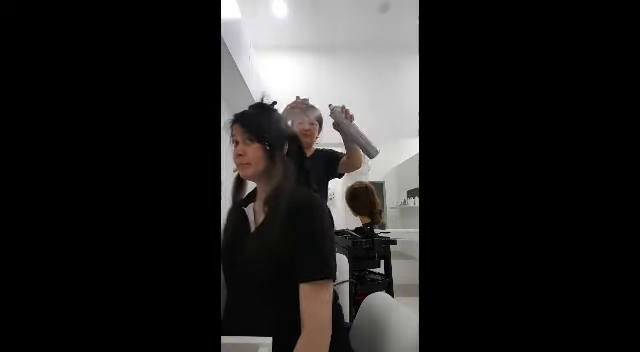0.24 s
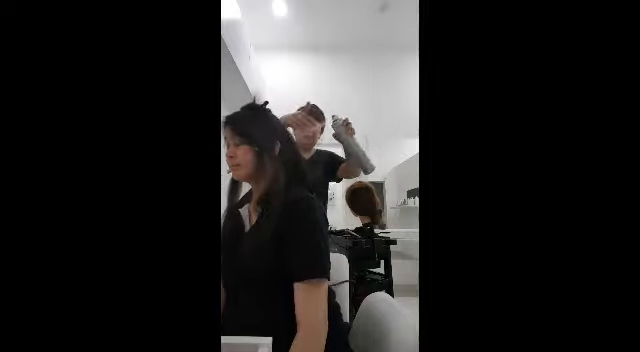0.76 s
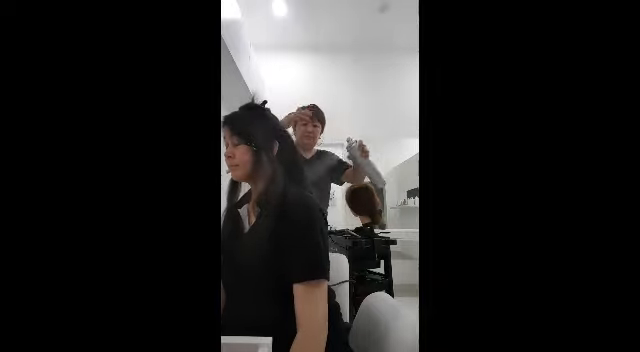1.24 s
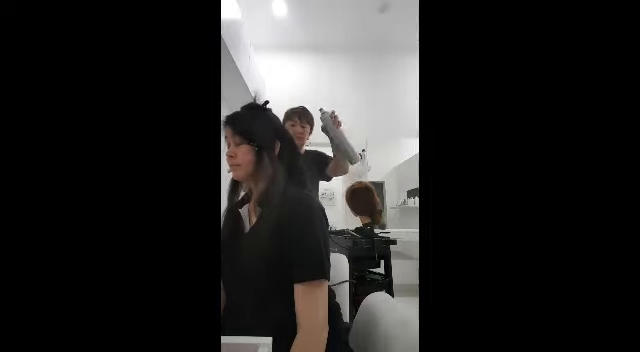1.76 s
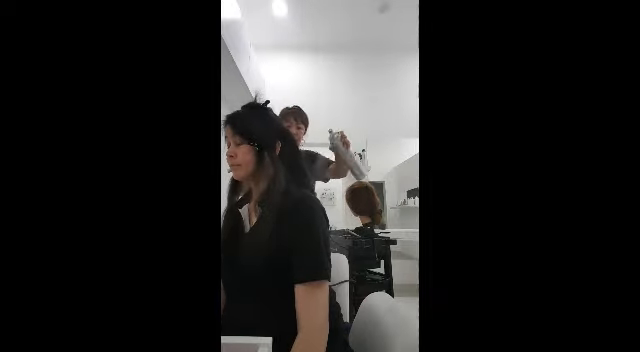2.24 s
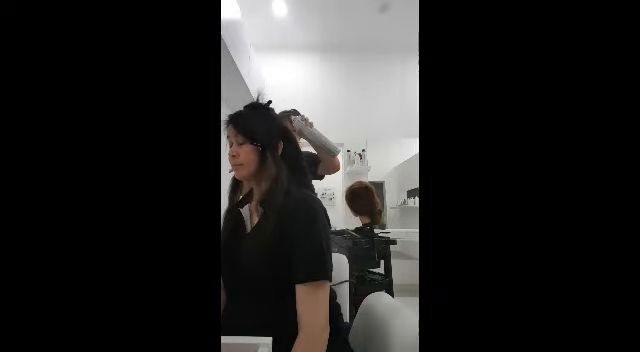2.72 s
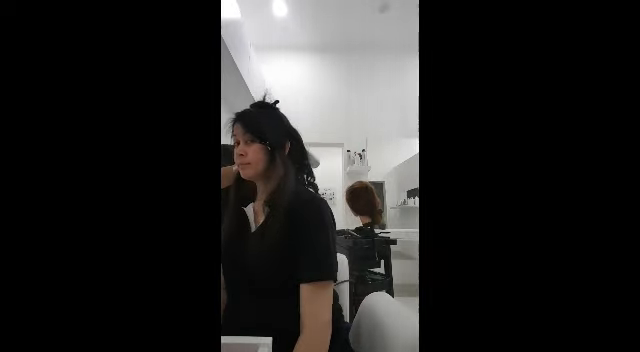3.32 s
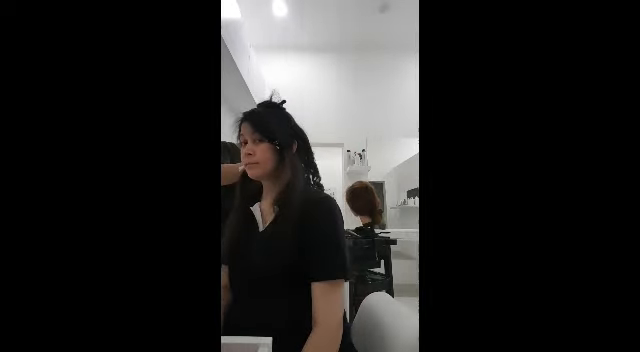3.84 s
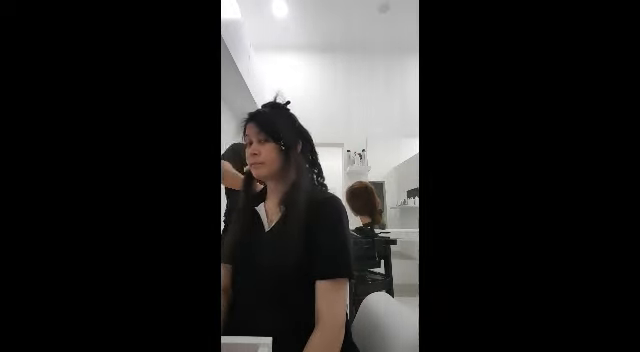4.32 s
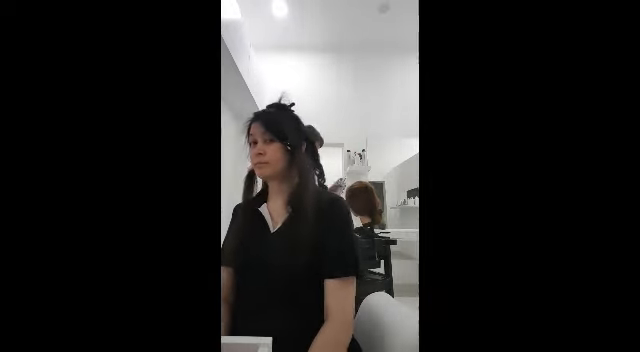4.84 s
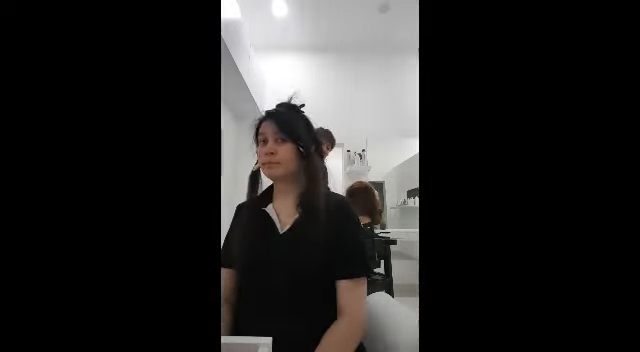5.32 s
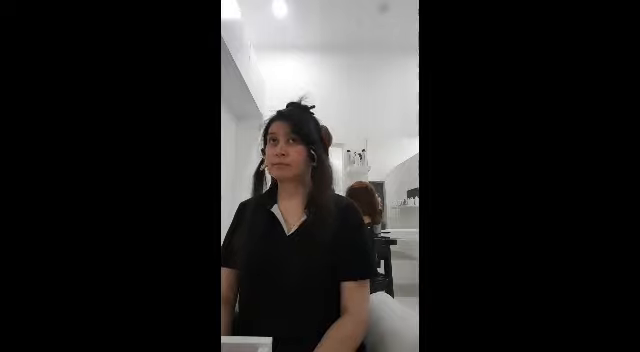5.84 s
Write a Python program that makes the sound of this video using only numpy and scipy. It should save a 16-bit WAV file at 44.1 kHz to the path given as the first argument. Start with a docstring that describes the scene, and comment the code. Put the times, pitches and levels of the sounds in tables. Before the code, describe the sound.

An aerosol can sprays three hissing bursts onto hair over a low ventilation hum, then furniture knocks and clatters.

```python
"""A hard-walled salon: an aerosol can sprays three long bursts a few steps away.
The jet sizzles at the nozzle, hisses as it spreads, splashes on hair and drags air along.
Underneath, ventilation drones in the low modes of the room. Small things clink and tick,
and near the end furniture is knocked farther off, its panels ringing and swelling in the echo."""
import sys
import numpy as np
from scipy import signal
from scipy.fft import rfft, irfft, next_fast_len
from scipy.io import wavfile
from scipy.ndimage import uniform_filter1d, map_coordinates

SR = 44100
rng = np.random.default_rng(int(sys.argv[2]) if len(sys.argv) > 2 else 0)


def generate_wav(sig):
    """Save sig (samples, or channels by samples) to the path in sys.argv[1] as 16-bit PCM at SR."""
    pcm = np.round(np.clip(np.atleast_2d(sig).T, -1, 1) * 32767).astype(np.int16)
    wavfile.write(sys.argv[1], SR, pcm)


N = 267775

# reverb time of the salon: f/Hz, T60/s
ROOM_DECAY = [(150, 0.28), (500, 0.57), (1800, 0.87), (2900, 0.91), (6000, 0.6), (14000, 0.25)]
# stereo image, near mono in the bass and wide on top: f/Hz, left-right correlation
CORRELATION = [(60, .93), (150, .994), (300, .985), (450, .78), (700, .3), (1000, -.1), (1600, 0),
               (15000, 0)]
# stereo balance: f/Hz, left over right/dB
BALANCE = [(60, -0.5), (150, 2), (380, -2), (950, -5), (2380, -3), (5980, -5), (15000, 2)]

# noise colours: f/Hz, relative level/dB
AIR_EQ = [(12, -51), (20, -14), (63, -13), (87, -8), (185, -8), (218, -21), (275, -9), (384, -18),
          (484, -15), (573, -25.5), (680, -26), (1000, -24), (3000, -36), (4500, -46), (6600, -120)]  # ventilation rumble
FAR_HISS_EQ = [(1470, -47), (2500, -7.5), (4700, -7), (8620, -12), (9310, -19.5), (13600, -9),
               (15700, -18.5)]  # faint distant hiss
SIZZLE_EQ = [(7000, -29), (10000, -8), (11500, -2), (13000, 1), (14500, 4), (15800, -1)]  # jet at the nozzle
PLUME_EQ = [(2350, -30.5), (4000, -9), (5920, -1.5), (7510, -1.5), (10500, -3.5), (13600, -3.5),
            (22000, -120)]  # spreading plume
SPLASH_EQ = [(1000, -7.5), (1500, -2.5), (2100, 3), (2750, 5), (3250, -1.5), (4200, -1), (5500, -25)]  # mist on hair
DRAUGHT_EQ = [(350, -20), (600, -7), (780, -6), (950, -2), (1200, -9.5), (1500, -6), (2200, -87)]  # air dragged along

# resonances: f/Hz, width/Hz, level/dB
ROOM_MODES = [(48, 48, -63), (98.6, 16.4, -60), (179.6, 33.7, -55), (267, 59, -64.5), (354.7, 32, -67.5)]  # driven by the ventilation
FLOOR_MODES = [(156.5, 39, -7)]  # boom
BODY_MODES = [(231.6, 17.6, 3.5)]  # hollow note
LARGE_PANEL_MODES = [(269, 16, 0.5), (363, 25, -5.5)]  # thud
SMALL_PANEL_MODES = [(444, 22, -5), (501, 36, -5.5), (560, 66, -10.5), (647, 29, -15.5), (689, 27, -11.5)]  # woody knock
FRAME_MODES = [(938, 110, 1.5), (1130, 30, 3)]  # rap
EDGE_MODES = [(1214, 62, -4.5), (1341, 65, 2), (1381, 37, 2), (1445, 33, 4.5), (1486, 13, 2),
              (1837, 150, -0.5)]  # crack
FITTING_MODES = [(1800, 700, 9.5), (3100, 850, -9.5), (4200, 660, -10), (5950, 1400, -36),
                 (7900, 1800, -23)]  # clack
TICK_MODES = [(3060, 1500, -3), (13000, 670, 3)]  # tiny hard contact

# furniture hits: t/s, then level/dB of floor, body, large panel, small panel, frame, edge, fittings
KNOCK_CUES = [(-.06, 3, 8, 14, 13.5, -11, -19.5, -28.5), (5.5558, 3, 12.5, -3, 9, -0.5, -4, -20.5),
              (5.624, 28.5, 26, 13, 26, 2.5, 15, -12), (5.641, 16, 12, 28, 13, -8, -14, -30),
              (5.659, 5, 9, 15, 15, -17.5, -6, -26), (5.669, 10, 17, 29, 9, -17, -19, -26),
              (5.688, -3, 8, 25, 12.5, -14, -8, -36), (5.705, 11, 11, 24.5, 13, -17, -15, -32),
              (5.721, 1, 11, 5, 9, -7, -2, -37), (5.855, 16.5, 0, 13, 8, -14, -4, -38),
              (5.91, 1.5, 3, 11.5, 3, -5, -9, -14), (5.963, 18, 22.5, 0, 17, -12, 8, -6),
              (5.976, 27, 26.5, -3, 3, 0.5, -6, -12.5), (6.012, 18, 7, 16, 1, -7, -4, -18),
              (6.045, 2, 23, 8, 10, -18, -19, -36)]
# light clinks, and the sharp cracks of the furniture knocks: t/s, level/dB, f/Hz, width/Hz, echo send/dB
RING_CUES = [(.25, -7, 2530, 400, -2), (1.52, -7.5, 2760, 380, -8), (2.123, -0.5, 2650, 700, 0),
             (2.139, -3, 2620, 600, -17), (5.559, -19, 2670, 402, 14), (5.6237, 15.5, 1490, 540, -5),
             (5.6236, -0.5, 2430, 900, 3), (5.909, -4, 2890, 190, 6), (5.911, -13, 2000, 350, 2),
             (5.922, -6, 2930, 220, 1), (5.958, -9, 2900, 300, -3), (5.963, 9, 1700, 350, -2),
             (5.985, -7, 2940, 299, -1)]
# dry ticks close by: t/s, level/dB
TICK_CUES = [(5.3868, -31.5), (5.461, -30.5)]
# button presses: press t/s, let-go t/s, opening/s, mist onset t/s, mist fade-in/s, closing/(dB/s),
# dribble length/s, dribble level/dB, splash level/dB, draught level/dB
BURST_CUES = [(0.131, 1.323, 0.069, 0.19, 0.0066, 259, 0.36, -33, -9, -16),
              (1.855, 2.548, 0.09, 1.888, 0.036, 126, 0.2, -31, -8, -32),
              (2.791, 4.301, 0.035, 2.67, 0.19, 134, 0.284, -31, -6.5, -13)]
# ride of the spray, one curve a burst: t/s, level/dB, turn from the right/dB (scaled by BEAMING)
FLOW_CURVES = [
    [(0.2, -50, -14), (0.372, -48, -10.5), (0.428, -47, -14.5), (0.538, -50, -15), (0.828, -48.5, -12.5),
     (1.118, -50.5, -15), (1.152, -47.5, -13.5), (1.33, -47.5, -13.5)],
    [(1.94, -40, -14), (1.954, -46, -15), (2.072, -46, -15), (2.104, -47.5, -17), (2.122, -44, -13),
     (2.316, -46, -16.5), (2.438, -43.5, -12), (2.53, -48, -14.5)],
    [(2.83, -60, 39), (2.86, -57, -14), (2.9, -51, 0), (2.922, -50.5, -10), (3.108, -50.5, -11.5),
     (3.388, -52.5, -7.5), (3.444, -52.5, -10.5), (3.528, -54, -11.5), (4.242, -50.5, -12),
     (4.27, -53, -12.5)],
]
# brief dips in the spray's mid band: t/s, level/dB, half-width/s
MID_DIPS = [(2.225, -20, 0.014), (3.522, -29, .012), (3.87, -14, 0.0093)]

SIZZLE_DB, PLUME_DB, BEAMING = -6, 1.5, 1.26
OPENING_POWER = 1.88  # the jet grows as this power of the button's travel
SURGE_DB, SURGE_S = 9, 0.04  # the first mist lands hardest
DRY_UP_S = 0.058  # fade-out of the dribble
HIT_LAG_S, WRAP_HZ = 14 / SR, 700  # hits reach the right late; the lag shrinks below WRAP_HZ


def amp(db):
    """Decibels to gain."""
    return 10 ** (np.asarray(db) / 20)


def unit(x):
    """x scaled to rms 1."""
    return x / np.sqrt(np.mean(x ** 2) + 1e-20)


def along(points, hz):
    """Read (f/Hz, value) points on a log frequency axis."""
    f, v = np.transpose(points)
    return np.interp(np.log(hz + 1), np.log(f + 1), v)


def wobble(rate):
    """A smooth random curve, rate knots a second."""
    knots = rng.standard_normal(int(N * rate / SR) + 4)
    return map_coordinates(knots, [np.arange(N) * rate / SR])


def filtered(x, response):
    """x through a complex frequency response."""
    size = next_fast_len(x.shape[-1] + SR // 2)
    return irfft(rfft(x, size) * response(np.fft.rfftfreq(size, 1 / SR)), size)[..., :x.shape[-1]]


def eq(points):
    """Response of an EQ curve."""
    return lambda f: amp(along(points, f))


def modes(table, level_db=0):
    """Response of a bank of resonances, alternating in polarity."""
    return lambda f: amp(level_db) * sum(
        (-1) ** k * amp(db) * 1j * f * width / (hz * hz - f * f + 1j * f * width)
        for k, (hz, width, db) in enumerate(table))


def ring(hz, width, level_db=0):
    """One resonance applied twice, for steep skirts."""
    return lambda f: amp(level_db) * modes([(hz, width, 0)])(f) ** 2


def soft(f, corner_hz):
    """Two-pole low-pass: the dulling of a soft contact or of distance."""
    return 1 / (1 + 1j * f / corner_hz) ** 2


def stereo(pair, response=lambda f: 1, min_correlation=-1, lag_samples=0):
    """Two unrelated signals as mid and side: alike in the bass, apart in the treble."""
    def spread(f):
        angle = np.arccos(np.clip(along(CORRELATION, f), min_correlation, 1)) / 2
        return response(f) * np.array([np.cos(angle), np.sin(angle)])
    mid, side = filtered(pair, spread)
    return np.array([mid + side, np.roll(mid - side, lag_samples)])


def rush(response, patchy_db, **image):
    """Coloured stereo noise of rms 1, mottled in time and frequency by patches of random gain."""
    spectra = signal.stft(rng.standard_normal((2, N)), nperseg=512)[2]
    patches = uniform_filter1d(rng.standard_normal(spectra.shape[1:]), size=4, axis=0)
    patches = uniform_filter1d(patches, size=14, axis=1)
    pair = signal.istft(spectra * amp(patchy_db * unit(patches)), nperseg=512)[1][:, :N]
    return unit(stereo(pair, response, **image))


def echo(swell_cycles):
    """A fresh room tail: each frequency swells over some cycles, then dies at its own speed."""
    hz, t, spectra = signal.stft(rng.standard_normal((2, SR)), SR, nperseg=256)
    rise = 1 - np.exp(-t * (hz[:, None] + 50) / swell_cycles)
    decay = amp(-60 * t / along(ROOM_DECAY, hz)[:, None])
    tail = stereo(signal.istft(spectra * rise * decay, SR, nperseg=256)[1][:, :SR])
    return tail / np.linalg.norm(tail[0])


def struck(hits, direct_db, echo_db, swell_cycles, path=lambda f: 1):
    """Each (t/s, response) hit rings its object, arrives left first, then returns from the walls."""
    out = np.zeros((2, N + 2 * SR))
    lag_s = lambda f: np.array([[0], [HIT_LAG_S]]) * f ** 2 / (f ** 2 + WRAP_HZ ** 2)
    impulse = amp(direct_db) * (np.arange(SR) == 0)
    direct = filtered(impulse, lambda f: path(f) * np.exp(-2j * np.pi * f * lag_s(f)))
    for at, response in hits:
        start = round((at + 1) * SR)  # one second of pre-roll
        out[:, start:start + SR] += filtered(direct + amp(echo_db) * echo(swell_cycles), response)
    return out[:, SR:SR + N]


def ventilation():
    """The bed: broad air noise, a drone where the room resonates, a far hiss and a wavering whine."""
    air = amp(-56) * rush(eq(AIR_EQ), patchy_db=1.73)
    hiss = amp(-74) * rush(eq(FAR_HISS_EQ), patchy_db=0.6)
    drone = sum(amp(db + 1.1 * wobble(6)) * rush(ring(hz, width), patchy_db=0.6)
                for hz, width, db in ROOM_MODES)
    whine = amp(-92 + 4 * wobble(1.6)) * rush(ring(hz=11250, width=45), patchy_db=3.0)
    return air + drone + hiss + whine


def furniture_knocks():
    """Each knock rings floor, wood and fittings in its own mix; a soft contact dulls the wood."""
    parts = FLOOR_MODES, BODY_MODES, LARGE_PANEL_MODES, SMALL_PANEL_MODES, FRAME_MODES, EDGE_MODES

    def knock(wood_dbs, fittings_db):
        def response(f):
            wood = sum(modes(part, db)(f) for part, db in zip(parts, wood_dbs))
            low_cut = (1j * f / (130 + 1j * f)) ** 2
            fittings = modes(FITTING_MODES, fittings_db)(f)
            return wood * low_cut * soft(f, corner_hz=2560) + fittings * soft(f, corner_hz=5300)
        return response

    def distance(f, shelf_hz=700):
        bass_cut = (amp(-2.5) + 1j * f / shelf_hz) / (1 + 1j * f / shelf_hz)
        return bass_cut * soft(f, corner_hz=3500)

    hits = [(at, knock(wood_dbs, fittings_db)) for at, *wood_dbs, fittings_db in KNOCK_CUES]
    return struck(hits, direct_db=-1.5, echo_db=5.0, swell_cycles=1.45, path=distance)


def clinks_and_cracks():
    """Short hard rings: light clinks and the sharp cracks of the knocks; farther ones are wetter."""
    return sum(struck([(at, ring(hz, width, db))], direct_db=0, echo_db=send_db, swell_cycles=5.0)
               for at, db, hz, width, send_db in RING_CUES)


def ticks():
    """Tiny contacts close by, bright and nearly dry."""
    hits = [(at, modes(TICK_MODES, db)) for at, db in TICK_CUES]
    return struck(hits, direct_db=0.5, echo_db=-7, swell_cycles=12)


def valve(t, burst):
    """Jet, splash and draught envelopes of one press: the valve opens, shuts, then dribbles dry."""
    press, let_go, opening, onset, fade_in, closing, dribble_s, dribble_db, splash_db, draught_db = burst
    after = np.maximum(t - let_go, 0)
    jet = np.clip((t - press) / opening, 0, 1) ** OPENING_POWER * amp(-closing * after)
    dribble = (t > let_go) * amp(dribble_db) * np.clip((dribble_s - after) / DRY_UP_S, 0, 1)
    surge = amp(SURGE_DB * np.exp(-np.abs(t - onset) / SURGE_S))
    mist = jet * surge * np.clip((t - onset) / fade_in, 0, 1)
    return np.array([np.maximum(jet, dribble), amp(splash_db) * mist, amp(draught_db) * mist])


def aerosol_spray():
    """Nozzle sizzle, plume hiss, splash on hair and dragged air, all sputtering with one flow."""
    t = np.arange(N) / SR
    times, *curves = np.transpose(np.concatenate(FLOW_CURVES))
    flow_db, turn_db = [np.interp(t, times, curve) for curve in curves]
    jet, on_hair, dragged = sum(valve(t, burst) for burst in BURST_CUES)
    # the sizzle beams: its right side rises and falls as the can turns
    aim = amp(SIZZLE_DB - BEAMING * turn_db * np.array([[0], [1]]))
    image = dict(min_correlation=0.27, lag_samples=4)  # the direct share, a touch late on the right
    sizzle = jet * aim * amp(0.6 * wobble(55)) * rush(eq(SIZZLE_EQ), patchy_db=1.6)
    plume = jet * amp(PLUME_DB) * rush(eq(PLUME_EQ), patchy_db=2.2, **image)
    splash = on_hair * amp(0.92 * wobble(9)) * rush(eq(SPLASH_EQ), patchy_db=2.6, **image)
    draught = dragged * amp(0.8 * wobble(10)) * rush(eq(DRAUGHT_EQ), patchy_db=1.6)
    dips = amp(sum(db * np.exp(-((t - at) / width) ** 2) for at, db, width in MID_DIPS))
    sputter_db = 0.5 * wobble(8) + 1.05 * wobble(35) + 0.5 * wobble(90)
    direct = amp(flow_db + sputter_db) * (sizzle + plume + dips * (splash + draught))
    reverb = signal.fftconvolve(direct, echo(swell_cycles=2.0), axes=1)[:, :N]
    return direct + amp(-7.5) * reverb


def scene():
    """The spray up front, over the room's bed and its hits."""
    return aerosol_spray() + ventilation() + furniture_knocks() + clinks_and_cracks() + ticks()


def record(dry):
    """Master: mids and most of the treble lean right, with a steep high cut and a brief end fade."""
    top_hz, fade_s = 15950, 0.004
    high_cut = lambda f: np.clip((top_hz - f) / 200, 0, 1) ** 2
    fade = np.clip(np.arange(N)[::-1] / (fade_s * SR), 0, 1)
    return filtered(dry * fade, lambda f: amp(along(BALANCE, f) * [[0.5], [-0.5]]) * high_cut(f))


dry = scene()
out = record(dry)
generate_wav(out)
```